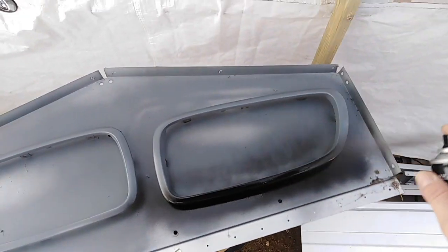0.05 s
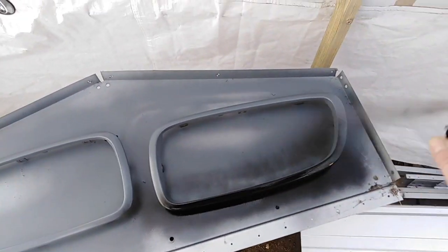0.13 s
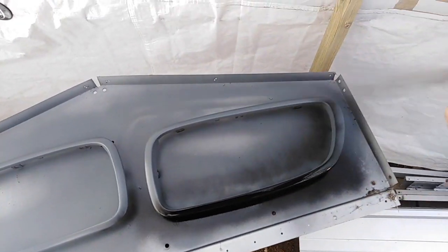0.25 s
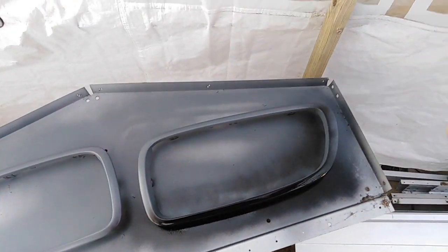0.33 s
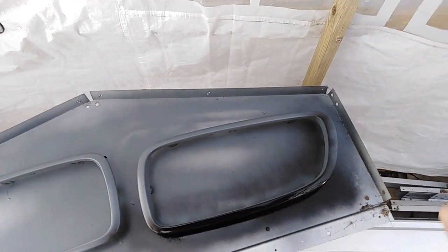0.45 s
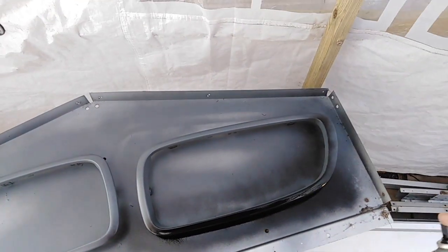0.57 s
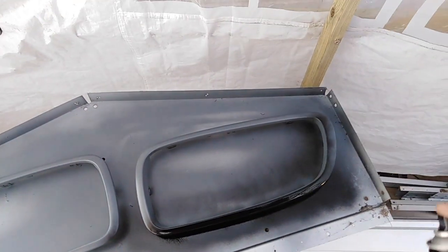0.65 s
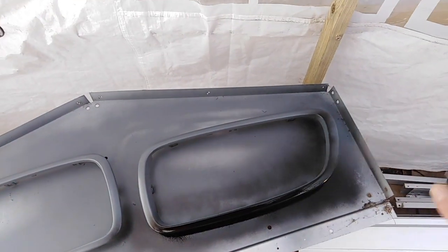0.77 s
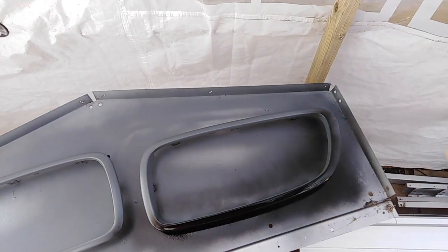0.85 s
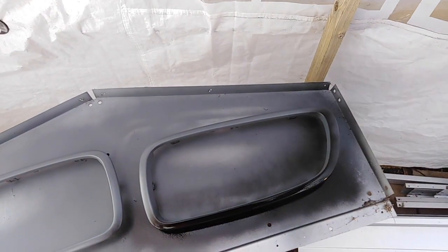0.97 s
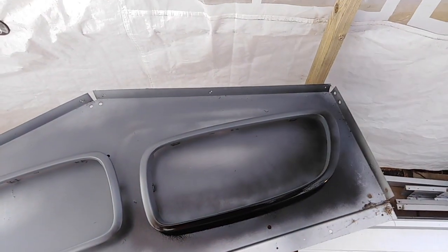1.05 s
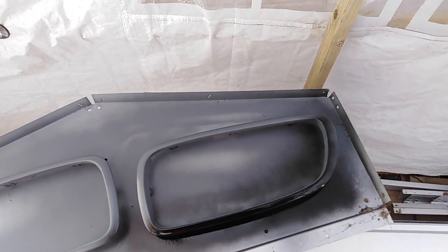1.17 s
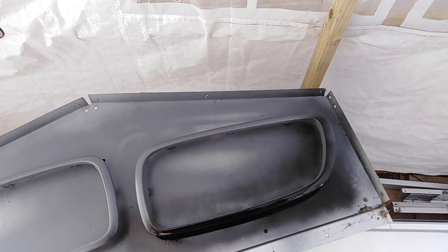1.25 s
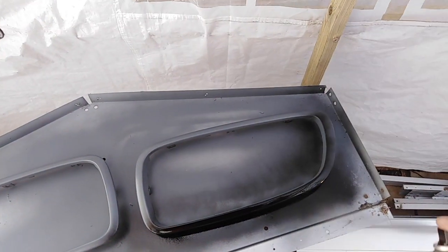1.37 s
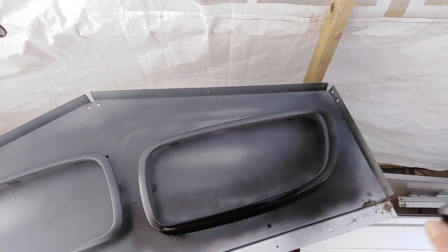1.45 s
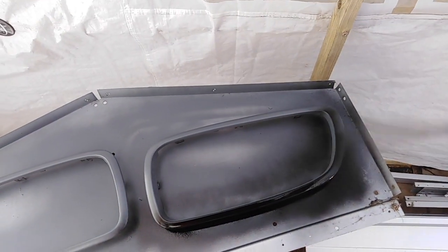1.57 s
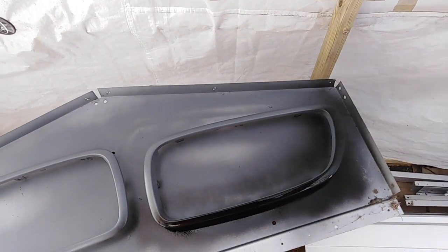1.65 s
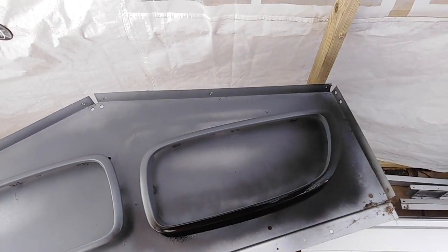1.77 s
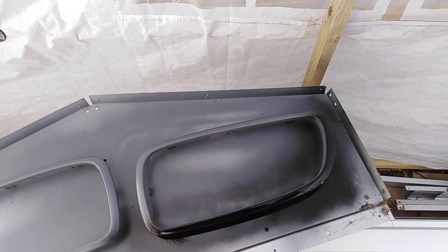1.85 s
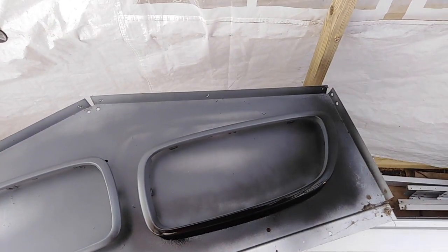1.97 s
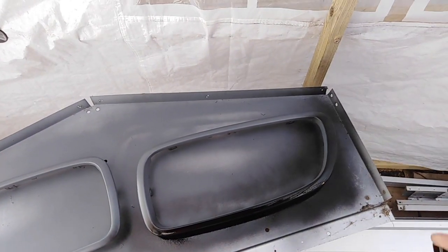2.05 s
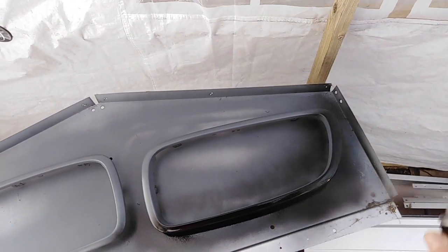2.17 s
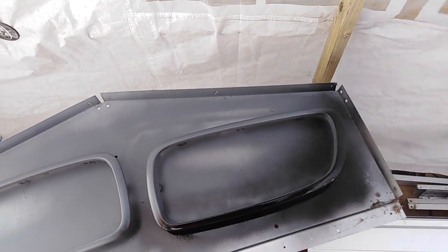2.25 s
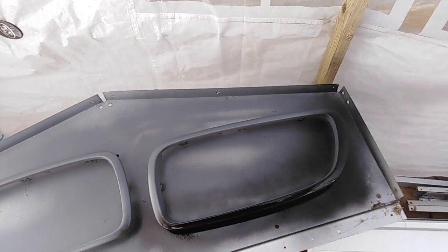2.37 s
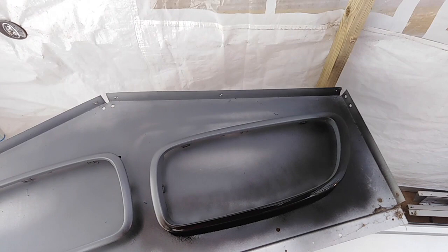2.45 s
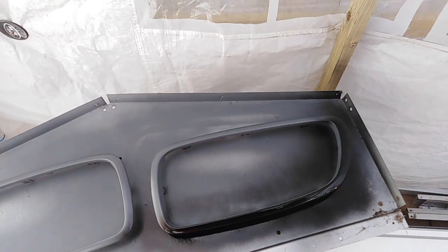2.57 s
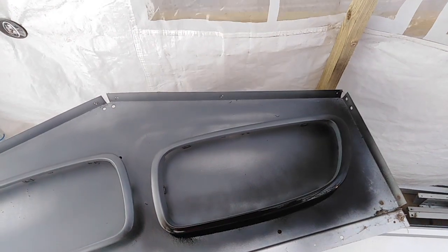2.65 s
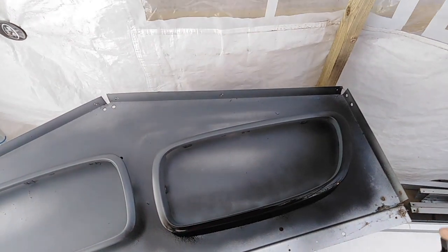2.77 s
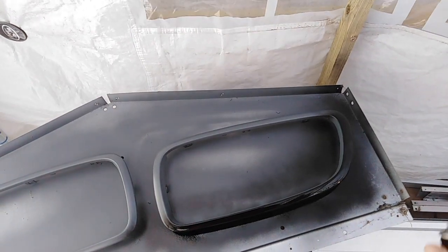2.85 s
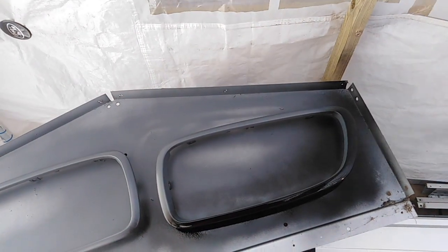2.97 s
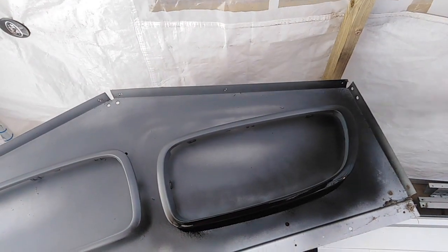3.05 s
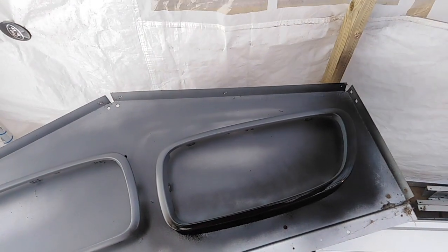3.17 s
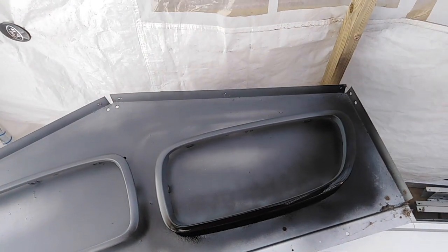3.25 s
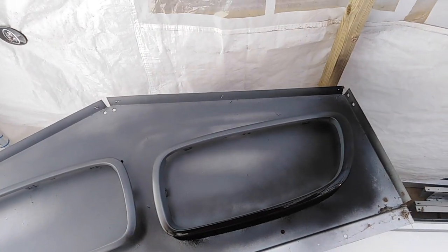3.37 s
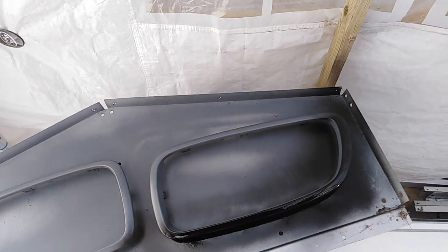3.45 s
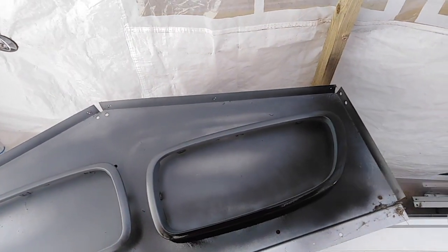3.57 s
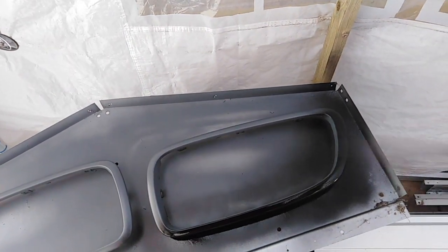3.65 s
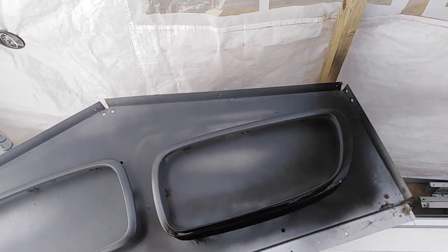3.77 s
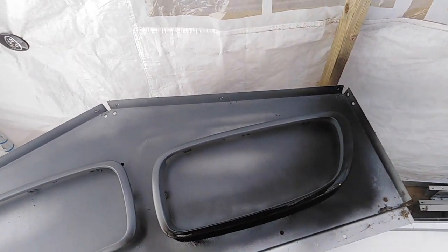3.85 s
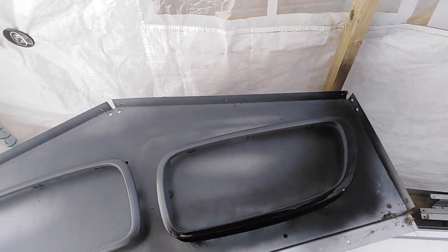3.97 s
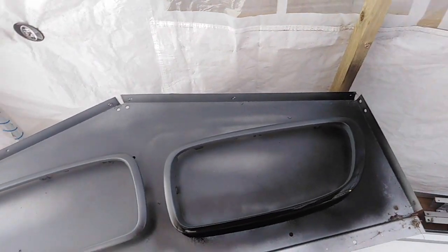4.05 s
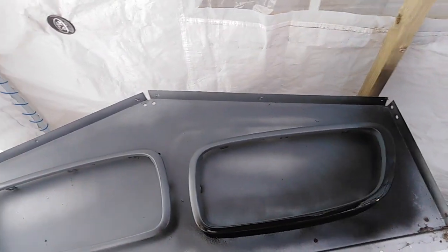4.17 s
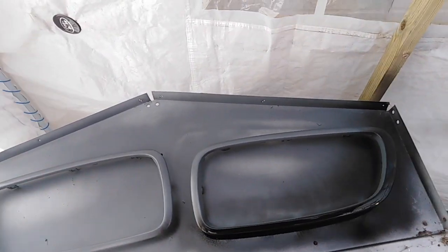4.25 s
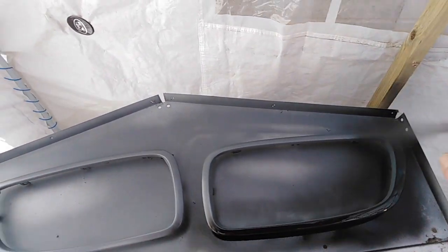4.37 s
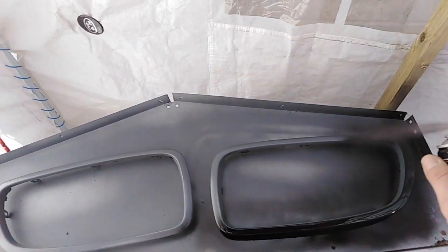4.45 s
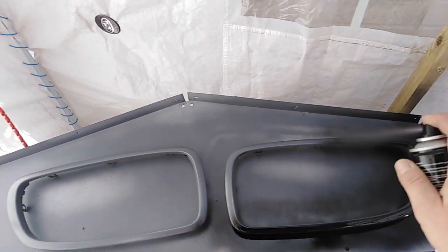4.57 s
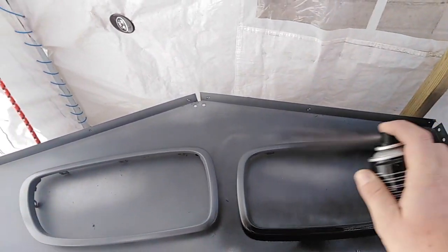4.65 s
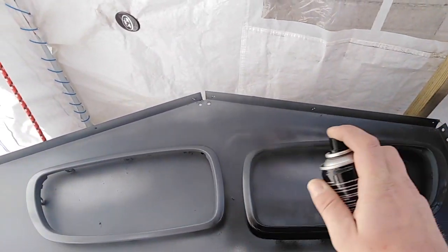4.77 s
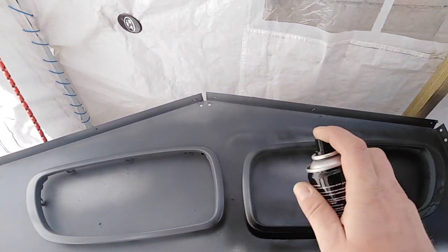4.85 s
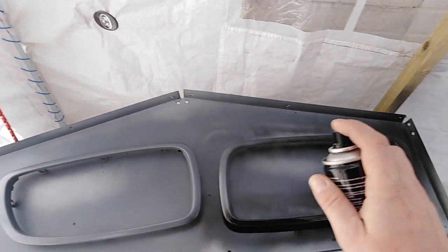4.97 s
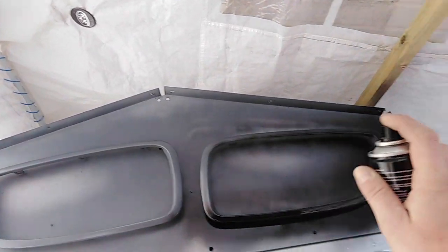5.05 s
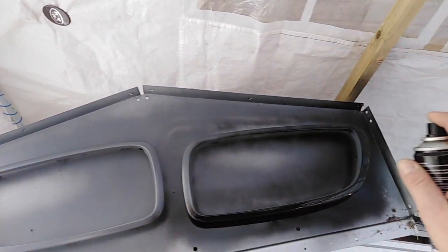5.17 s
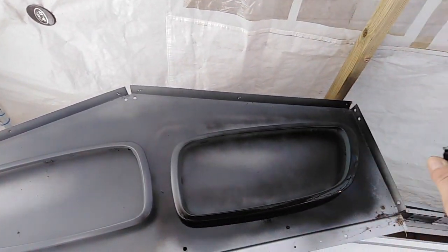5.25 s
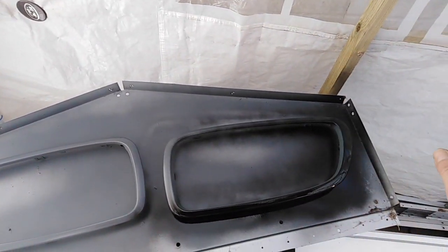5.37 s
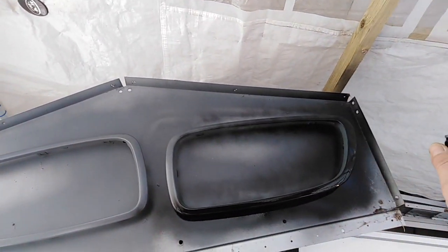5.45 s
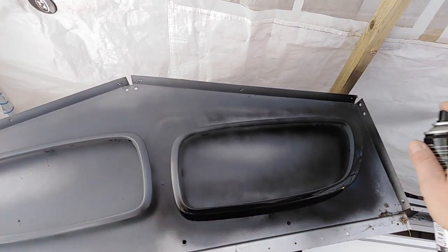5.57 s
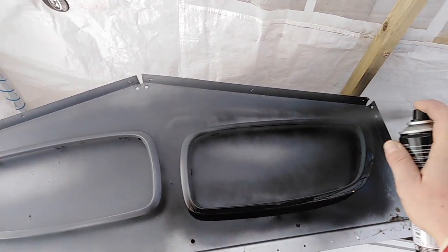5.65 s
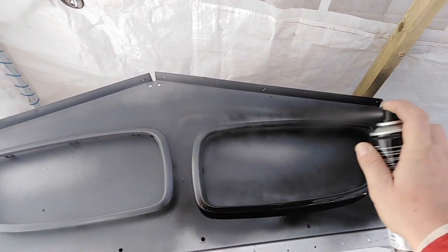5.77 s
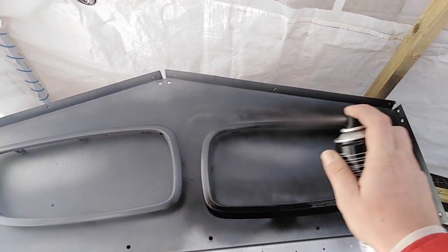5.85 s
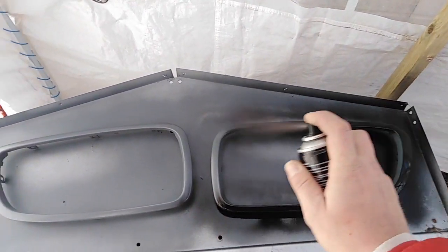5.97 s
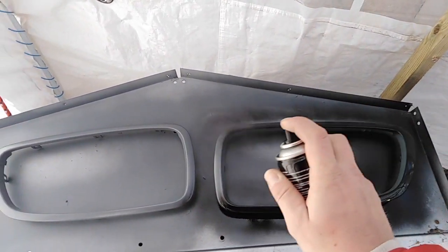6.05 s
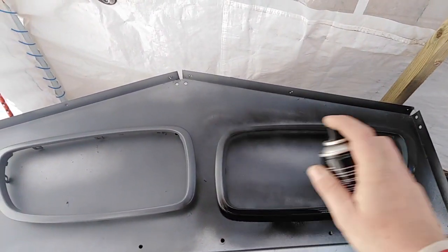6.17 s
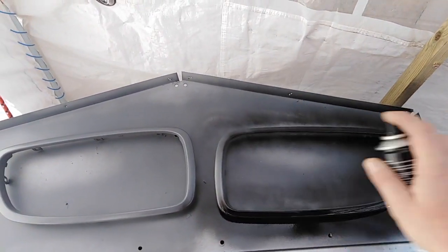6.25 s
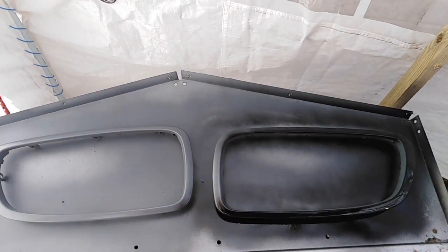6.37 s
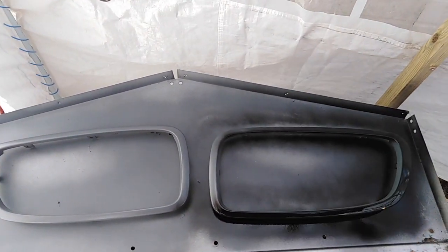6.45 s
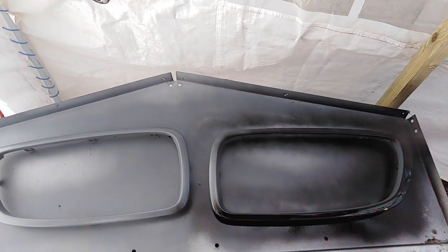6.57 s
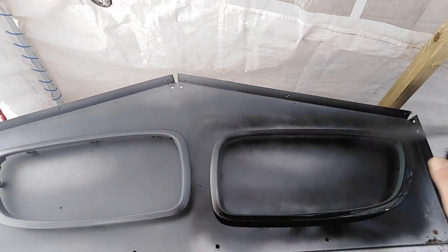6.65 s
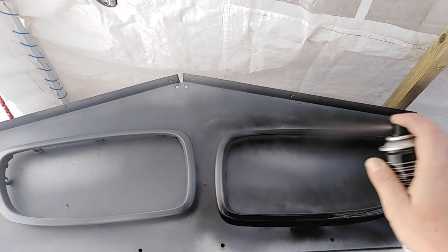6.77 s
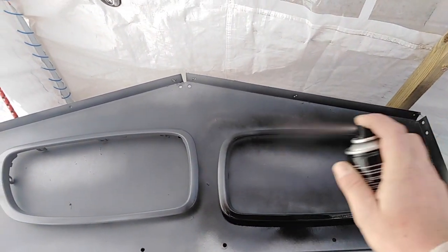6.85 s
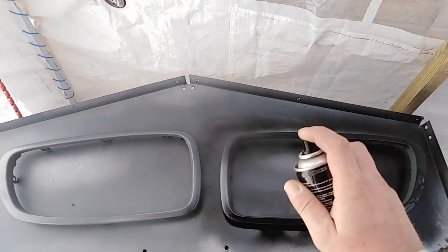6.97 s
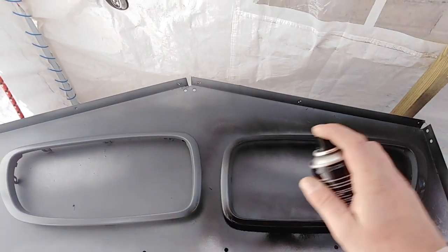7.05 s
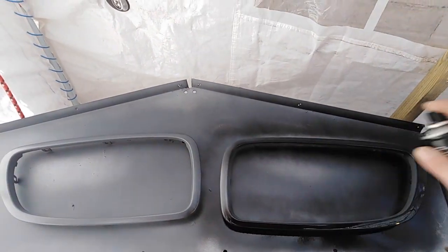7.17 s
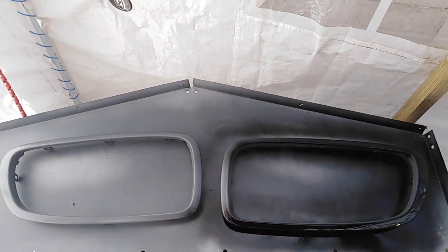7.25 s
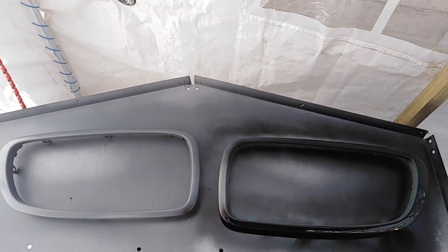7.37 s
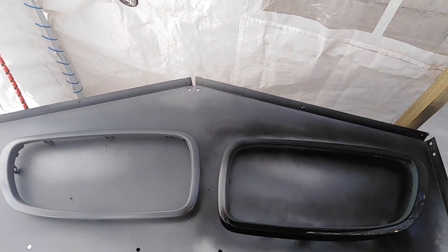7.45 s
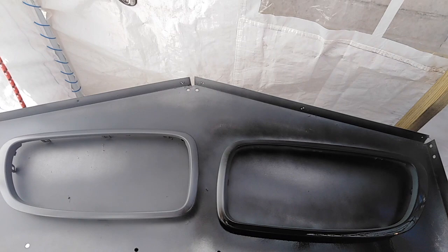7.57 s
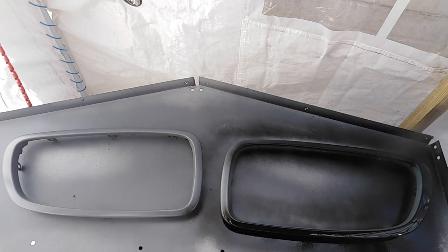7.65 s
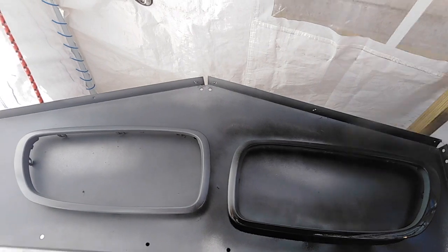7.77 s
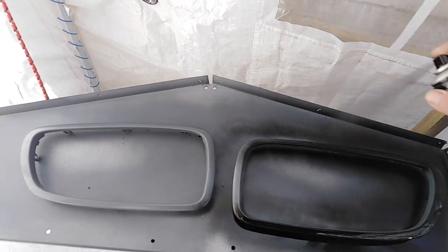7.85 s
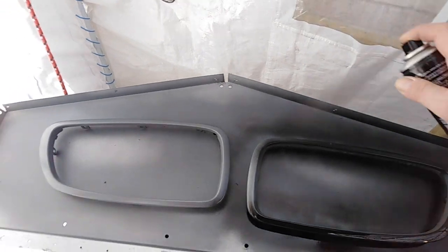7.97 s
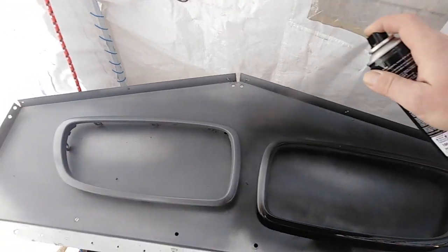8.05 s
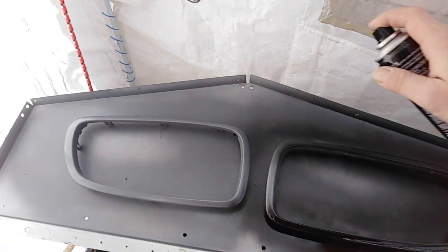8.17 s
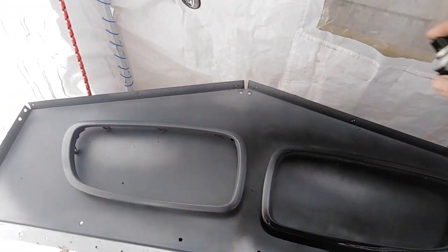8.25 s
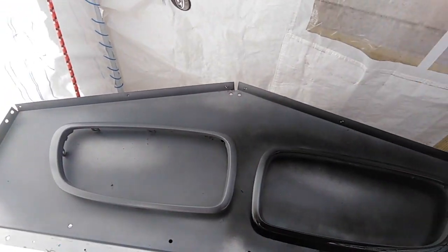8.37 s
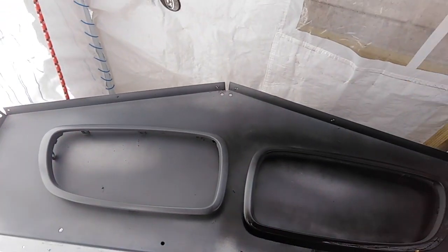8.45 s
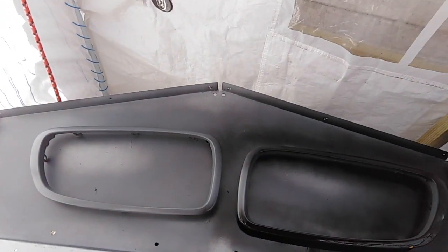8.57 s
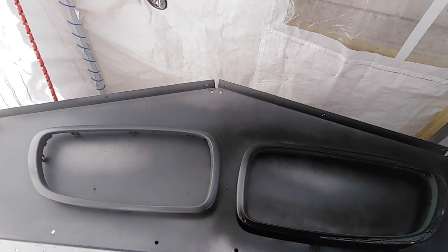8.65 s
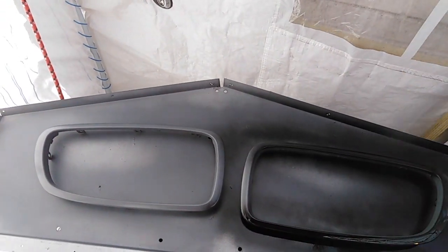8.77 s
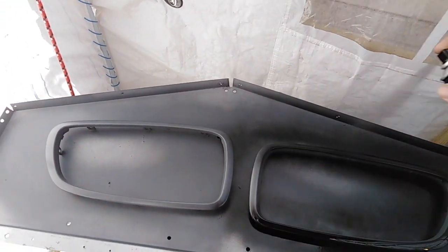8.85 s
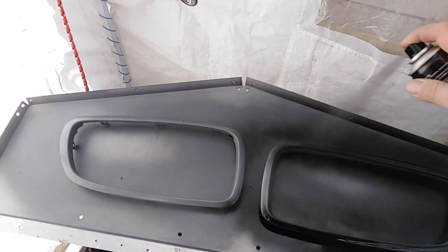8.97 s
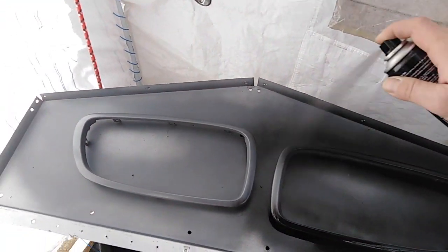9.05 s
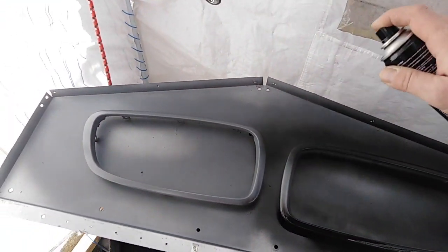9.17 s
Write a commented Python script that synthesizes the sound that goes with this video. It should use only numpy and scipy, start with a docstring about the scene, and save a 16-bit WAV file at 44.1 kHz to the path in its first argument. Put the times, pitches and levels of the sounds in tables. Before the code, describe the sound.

A nearby spray paint can works outdoors, a little right of a stereo microphone. A bright, sharp hiss is already sounding at 0 s and stops by 0.3; a dense burst of hard steel ball clacks and grainy paint slosh follows at 0.45-0.63. Short sprays then come at about 0.6, 1.3, 2.1, 2.8 and 3.5 s, with quick rattles between them. From 4.2 s the hisses lengthen to about half a second: 4.2, 5.5, 6.5, 7.4 and 8.6, the 7.4 one longest. Rattles are softer near 4.8 and nearly absent around 5.2, return at 6.1-6.4 and 7.1-7.4, and hit loudest at 8.5. Low lumpy rumble and rustle lie beneath, with dull brushing near 2.4-2.7 s and fluttering low wind puffs on the left at 7.2 and 9 s, quieter whenever the spraying pauses.

```python
"""Spray painting with a rattling can

A paint can is swept to and fro outdoors, right of a two-port camera microphone.
Each press of the valve lets out a bright hiss: noise shaped as a jet over a duller body.
At each turn the mixing ball strikes damped steel modes and the paint sloshes as grainy noise.
Low noise makes the rumble, rustle and brushing; wobbling tones make puffs of wind on the ports."""
import sys
import numpy as np
from scipy import signal
from scipy.fft import rfft, irfft, next_fast_len
from scipy.io import wavfile
from scipy.ndimage import uniform_filter1d

SR = 44100
rng = np.random.default_rng(int(sys.argv[2]) if len(sys.argv) > 2 else 0)


def store_wav(level_fs):
    """Save 16-bit WAV to argv[1]."""
    pcm = np.round(np.clip(np.atleast_2d(level_fs), -1, 1) * 32767)
    wavfile.write(sys.argv[1], SR, pcm.T.astype(np.int16))


N = 406602


def from_db(db):
    """Decibels to gain."""
    return 10 ** (np.asarray(db) / 20)


def rms_one(x):
    """Scale to unit rms."""
    return x / np.sqrt(np.mean(x ** 2) + 1e-20)


def in_time(rows):
    """Columns of a table, joined by straight lines, at every sample."""
    s, *columns = np.transpose(rows)
    return [np.interp(np.arange(N) / SR, s, column) for column in columns]


def at_hz(points, hz):
    """A spectrum table read on a log-frequency axis."""
    point_hz, value = np.array(points).T
    return np.interp(np.log(hz), np.log(point_hz), value)


def drift(rate_hz):
    """Slow chance: noise at every 20th sample through a double one-pole low-pass; spread 1."""
    r = np.exp(-40 * np.pi * rate_hz / SR)
    noise = rng.standard_normal(N // 20 + 2002)
    slow = signal.lfilter([1], [1, -2 * r, r * r], noise)[2000:]   # drop the filter's start
    return np.interp(np.arange(N) / 20, np.arange(len(slow)), rms_one(slow))


def resonance(x, hz, width_hz):
    """Two-pole peak of gain 1."""
    r = np.exp(-np.pi * width_hz / SR)
    poles = [1, -2 * r * np.cos(2 * np.pi * hz / SR), r * r]
    return signal.lfilter([(1 - r * r) / 2, 0, (r * r - 1) / 2], poles, x)


def coloured(spectrum, flicker_db, rate_hz):
    """Three unrelated noises with one spectrum and one shared flicker; rms 1."""
    size = next_fast_len(N)
    hz = np.maximum(np.arange(size // 2 + 1) * SR / size, 1)
    white = rfft(rng.standard_normal((3, size)))
    noise = irfft(white * from_db(at_hz(spectrum, hz)), size)[:, :N]
    return rms_one(noise * from_db(flicker_db * drift(rate_hz)))


def swells(rows):
    """Bell-shaped rises and falls of gain."""
    t = np.arange(N) / SR
    return sum(from_db(db) * np.exp(-.5 * ((t - s) / half_s) ** 2) for s, half_s, db in rows)


def shape_db(start_s, rise_s, length_s, power, fade_db_per_s, end_db_per_s):
    """Rise as a power of time, a steady fade, then an added fall from the end; dB re the top."""
    t = np.arange(N) / SR - start_s
    rise_db = 20 * power * np.log10(np.clip(t / rise_s, 1e-6, 1))
    fade_db = fade_db_per_s * np.clip(t - rise_s, 0, max(length_s - rise_s, 0))
    end_db = end_db_per_s * np.maximum(t - length_s, 0)
    return rise_db - fade_db - end_db


def two_ports(common, left, right, lag_s, solid=0):
    """Per frequency, a share reaches both ports, offset in time on the left; the rest is each port's own.

    All of it is shaded between the ports; solid reaches both whole."""
    # share common to both ports: hz, share (0 to 1)
    likeness = [(60, 0.91), (130, 0.83), (290, 0.94), (640, 0.63), (2400, 0.37), (4500, 0.16), (8000, 0.15),
                (14000, 0.022)]
    # left port against right: hz, level_db
    shadow = [(60, 0), (600, -1), (2000, -3.5), (4300, -3), (8000, -8.5), (14000, -6)]
    size = next_fast_len(N + 64)
    hz = np.maximum(np.arange(size // 2 + 1) * SR / size, 1)
    alike = np.clip(at_hz(likeness, hz), 0, 1)
    shade = from_db(at_hz(shadow, hz) / 2)   # half the difference at each port
    c, l, r, whole = rfft([common, left, right, solid + 0 * common], size)
    both = np.sqrt(alike) * c + whole
    late = np.exp(-2j * np.pi * hz * lag_s)
    at_left = shade * (both * late + np.sqrt(1 - alike) * l)
    at_right = (both + np.sqrt(1 - alike) * r) / shade
    return irfft([at_left, at_right], size)[:, :N]


def valve():
    """Gains of the jet and of its body: each press opens as a power of time, sags, then closes."""
    # presses: start_s, rise_s, held_s (from the start), closing_db_per_s, jet_db, sag_db_per_s,
    # body_db (re the jet)
    presses = [(-.1, 0.076, 0.34, 312, -18.5, 14.5, -11), (0.626, 0.047, 0.31, 400, -23.5, -0.5, -8),
               (1.295, 0.04, 0.37, 279, -19, 12, -13), (2.06, 0.058, 0.3, 299, -21, -2.5, -12),
               (2.797, 0.12, 0.29, 289, -21.5, 13, -11), (3.451, 0.056, 0.34, 250, -17, 12.5, -13),
               (4.191, 0.054, 0.53, 330, -22, -3, -12.5), (5.472, 0.095, .51, 252, -21, -0.5, -12),
               (6.498, 0.077, 0.45, 324, -20.5, 0.5, -12), (7.422, 0.15, 0.67, 409, -20.5, 2.5, -13),
               (8.582, 0.0028, 0.52, 314, -19.5, 5.5, -15.5)]
    opening_power = 1.39
    seals_below_db, seal_steeper = -56.5, 1.1   # extra dB per dB below this level
    jet, body = 0, 0
    for s, rise_s, held_s, closing, jet_db, sag, body_db in presses:
        db = jet_db + shape_db(s, rise_s, held_s, opening_power, sag, closing)
        gain = from_db(db + seal_steeper * np.minimum(db - seals_below_db, 0))
        jet = jet + gain
        body = body + gain * from_db(body_db)
    return jet, body


def patchy(x, patch_db, rate_hz):
    """Bands half an octave apart swell separately as the moving hand changes the echoes off the panel."""
    size = next_fast_len(N)
    spectrum, hz = rfft(x, size), np.arange(size // 2 + 1) * SR / size
    place = np.clip(2 * np.log2(np.maximum(hz, 1) / 2500), 0, 5)   # half octaves above 2500 Hz
    out = 0
    for centre in range(6):
        share = np.clip(1 - abs(place - centre), 0, 1)   # overlapping triangles
        band = irfft(spectrum * share, size)[:, :N]
        out = out + from_db(patch_db * drift(rate_hz)) * band
    return out


def spray():
    """Turbulent jet noise that sputters with the droplets; below it a duller body."""
    # bright jet, relative spectrum: hz, level_db (per Hz)
    jet_spectrum = [(1900, -37.5), (3200, -4), (4480, -2), (5800, 0.5), (8000, 0.5), (10600, 6),
                    (13000, 4.5), (14250, 4.5), (14450, -61)]
    # lower part of the hiss, with a broad nozzle resonance: hz, level_db (per Hz, relative)
    body_spectrum = [(300, -12), (600, -13.5), (1100, -11), (2000, -5.5), (2450, 1), (2870, 3), (3150, -9),
                     (3500, -21), (4500, -28.5)]
    jet_gain, body_gain = valve()
    body = coloured(body_spectrum, flicker_db=2.0, rate_hz=15)
    jet = patchy(coloured(jet_spectrum, flicker_db=.9, rate_hz=150), patch_db=1.6, rate_hz=20)
    sputter = from_db(0.36 * drift(26))
    return sputter * (jet_gain * jet + body_gain * body)


def bed():
    """Lumpy rumble and rustle, nearby brushing, a faint tone, and puffs that set the left port wobbling."""
    # low bed over time: time_s, rumble_db, rustle_db
    bed_levels = [(0.0, -51.5, -53.5), (.8, -47.5, -53), (1.6, -53, -50), (2.4, -46, -47), (3.3, -48, -46),
                  (4.0, -50.5, -48.5), (4.7, -49.5, -58.5), (5.1, -50, -59.5), (5.6, -52.5, -49.5),
                  (7.0, -49, -48.5), (8.04, -53, -48), (8.27, -54.5, -48.5), (9.22, -45, -44.5)]
    # relative spectra: hz, level_db (per Hz)
    rumble_spectrum = [(25, -29), (45, -36), (70, 10.5), (100, 1.5), (150, 3.5), (230, -47.5)]
    rustle_spectrum = [(120, -10.5), (200, 4), (350, 1.5), (500, -2), (650, -15.5), (1000, -44.5)]
    scuff_spectrum = [(120, -29), (220, -8), (350, -0.5), (480, -11), (650, -12.5), (2000, -7.5),
                      (3500, -26)]
    # dull broad brushing: middle_s, half_length_s (standard deviation), level_db
    scuff_swells = [(2.12, 0.018, -36.5), (2.35, 0.025, -29.5), (2.686, 0.27, -38.5), (0.74, 0.14, -40.5),
                    (6.56, 0.0065, -36), (7.28, 0.036, -47.5), (9.06, 0.11, -40.5)]
    # wind: middle_s, half_length_s (standard deviation), level_db (before each port's gain below)
    puff_swells = [(5.352, 0.0099, -43), (7.163, 0.012, -29), (7.193, 0.015, -27.5), (7.245, 0.023, -39),
                   (7.31, 0.017, -42), (8.945, 0.014, -23), (9.0, 0.012, -31.5), (9.105, .01, -32),
                   (9.14, .008, -38.5), (9.2, 0.025, -42)]
    hum_middle_s, hum_half_s, hum_db = 6.7, 0.91, -56.5
    hum_hz, hum_width_hz = 200.5, 5.4

    rumble_db, rustle_db = in_time(bed_levels)
    rumble = from_db(rumble_db) * coloured(rumble_spectrum, flicker_db=4.0, rate_hz=27)
    rustle = from_db(rustle_db) * coloured(rustle_spectrum, flicker_db=4.5, rate_hz=9.6)
    scuff = swells(scuff_swells) * coloured(scuff_spectrum, flicker_db=2.0, rate_hz=86)

    tone = rms_one(resonance(rng.standard_normal(N), hum_hz, hum_width_hz))
    hum = swells([(hum_middle_s, hum_half_s, hum_db)]) * tone

    wobble_hz = 104 * from_db(2.2 * drift(50))   # pitch wanders around 104 Hz
    turn = 2 * np.pi * np.cumsum(wobble_hz) / SR
    wobble = np.sin(turn) + 0.18 * np.cos(2 * turn)
    puff = swells(puff_swells) * from_db(1.0 * drift(37)) * wobble
    port_gain = from_db([[8], [-10]])   # left, right
    return two_ports(*(rumble + rustle + scuff + hum), 0) + puff * port_gain


def slosh():
    """Wet grainy wash, with dense small ticks of the rolling ball; fingers tap the shell now and then."""
    # paint surging as the arm slows and swings back:
    # start_s, rise_s, lasts_s (from the start), peak_db, fading_db_per_s
    surges = [(0.247, .03, 0.22, -53, 37), (0.465, 0.0073, 0.36, -33, 8), (0.973, .03, 0.26, -59.5, 28),
              (1.118, 0.011, 0.3, -35, 34), (1.708, 0.03, 0.13, -48, 248), (1.803, 0.067, 0.37, -38, -19),
              (2.384, 0.0091, 0.13, -37, 83), (2.483, 0.053, 0.17, -39, 20), (2.608, 0.0083, 0.4, -35, -1),
              (3.089, 0.15, 0.21, -39, 260), (3.313, 0.0086, 0.41, -31.5, 51),
              (3.851, 0.039, 0.15, -41, 209), (4.023, 0.009, 0.13, -55, 109), (4.103, 0.16, 0.19, -29.5, 6),
              (4.728, 0.033, 0.16, -46.5, -3), (5.986, 0.16, 0.19, -30.5, 246.5),
              (6.18, 0.02, 0.085, -52, 5), (6.276, 0.023, 0.43, -34, 38), (6.973, 0.019, 0.18, -47, 31),
              (7.127, 0.14, 0.38, -36.5, 54), (8.11, 0.027, 0.27, -46, 82), (8.416, .005, 0.022, -66, 100),
              (8.476, 0.0027, 0.028, -31.5, 255), (8.518, 0.0055, 0.24, -31.5, -1),
              (9.133, 0.029, 0.12, -42, 5)]
    # relative spectrum of the wash: hz, level_db (per Hz)
    wash_spectrum = [(500, -27), (900, -9), (2300, -9), (3200, 2), (6000, -5), (10700, -10), (14200, -18),
                     (14450, -74)]
    # fingers shifting on the can: middle_s, half_length_s (standard deviation), level_db
    tap_swells = [(.424, 0.0016, -33.5), (3.23, 0.037, -42), (8.27, 0.018, -46.5), (8.33, 0.013, -52.5),
                  (8.42, 0.019, -59)]
    surge_power, settle_db_per_s = 2.28, 697.5   # gain grows as time to a power; then the paint settles
    rest_db = -94   # faint wash while the arm rests

    level = 0
    for s, rise_s, lasts_s, db, fading in surges:
        level = level + from_db(db + shape_db(s, rise_s, lasts_s, surge_power, fading, settle_db_per_s))

    # about 300 ticks a second, each dying away in 0.7 ms
    ticks = (rng.random(N) < 300 / SR) * np.minimum(rng.exponential(0.6, N), 2.5)
    grain = 1 + signal.lfilter([1], [1, -np.exp(-1 / (0.0007 * SR))], ticks)
    moving = level * grain * from_db(1.5 * drift(60))
    wash = (from_db(rest_db) + moving) * coloured(wash_spectrum, flicker_db=1.2, rate_hz=12)

    shell = resonance(rng.standard_normal((3, N)), 1100, 600)
    shell = rms_one(resonance(shell, 1100, 600))
    taps = swells(tap_swells) * from_db(4 * drift(70)) * shell
    return wash + taps


def knocks():
    """A sharp contact, a noisy skid and a faint ringing-on drive the damped wall modes.

    Each spot struck weighs the modes anew."""
    # mixing ball on the wall: time_s, peak_db (before wall_db), brightness_db (per octave over
    # 3800 Hz, before even_bright_db is taken off), skid_db (re the contact)
    ball_hits = [(0.3504, -38, -11.0, -1), (0.4213, -34, -4, -3), (0.4687, -16, -2, -9.0),
                 (0.4795, -10, -2.5, -3.0), (0.5045, -8.5, -7, -17), (0.5176, -13, -4, -6),
                 (0.5356, -13.0, -6, -4.0), (0.541, -13, -6.0, -4.0), (0.546, -14.5, 1, 0),
                 (0.5703, -16, -2, -26), (0.5898, -18, 0, -10.0), (0.6009, -12.5, 5, -3),
                 (0.6256, -17.5, 3, -6), (1.1244, -18, 2, -6), (1.149, -12, -4, -14),
                 (1.182, -15.5, 4, -12), (1.1998, -20, 2, -13), (1.2335, -20.0, -8, 0),
                 (1.8352, -17.5, 2, 1), (1.8613, -16, 2, -4), (1.8862, -9.5, -6, -11),
                 (1.9032, -29, 5, -12), (1.9366, -7, -8, -7), (1.9482, -20, -8, -10), (1.96, -23, -17, -11),
                 (1.976, -29, -9, 6), (1.979, -15, 1, -5.0), (2.03, -17, 0.5, -12), (2.0617, -15, 0, -6.0),
                 (2.522, -18, -5, -5), (2.5534, -20, 2, -10.0), (2.5718, -21, -7.0, 0),
                 (2.5795, -8.5, -4, -10.0), (2.6217, -11.5, -9, -13), (2.6258, -23, 0, -4.0),
                 (2.652, -20, -9, -3.0), (3.1554, -22, -1, -21), (3.2354, -26, 4, 0), (3.3198, -11.5, 1, 1),
                 (3.3303, -13.5, -5, 2), (3.3442, -16, 3, 0), (3.372, -11, -5, 2), (3.3894, -18, 2, 0),
                 (3.4062, -15, 0, -5.0), (3.4384, -20.0, 5, 4), (4.1282, -23, -7.5, 2),
                 (4.153, -24.5, -3, 0), (4.8099, -20, -10, -11), (4.8766, -25.5, -9.5, -7),
                 (5.08, -58.0, -26.5, -12), (5.1345, -48.5, -31, -8), (5.159, -48, -20, -4.0),
                 (5.2368, -49.5, -20.5, -5.0), (5.3472, -46, -39, -7.0), (6.0645, -23, -12.5, -8.0),
                 (6.139, -20, -18, -5.0), (6.1578, -20, -19, -7.0), (6.269, -32.5, -8.0, 3),
                 (6.2981, -28, -10, -5.0), (6.33, -21, 2, 1), (6.362, -18.5, -5, 7), (6.4324, -18, -5, 0),
                 (6.4487, -23.0, -16, -8), (7.106, -29.0, -9, 6), (7.234, -23, 2, -2), (7.2706, -16, 4, -1),
                 (7.2986, -17.5, 1.5, 10), (7.3522, -19, -3, -3), (7.3754, -17, 0.5, -8),
                 (8.4796, -10.0, -2, -4.0), (8.5247, -2, -0.5, -9), (8.556, -11.5, 4, -2),
                 (8.5837, -10, -11, -4), (8.5861, -7, -10, 1)]
    # wall resonances: pitch_hz, width_hz (doubled in each of two passes), level_db
    wall_modes = [(2910, 740, -3), (3366, 546, 5), (4030, 930, 4), (4990, 660, 0), (5660, 310, -1),
                  (6470, 390, -2), (7700, 510, -1), (9100, 1100, -3), (11340, 400, -4), (12000, 3600, -17)]
    wall_db, even_bright_db = 2, -3.5   # gain on every peak; brightness that leaves the modes as listed
    contact_s, skid_s, ring_s = .0011, .006, .028   # decay times of the three parts of a knock
    ring_db, ring_width_hz = -17, 300
    gentle_below_db = -40   # gentler touches mostly set the sharper modes ringing
    lag_s, likeness = -0.00022, .55   # knocks wrap further round; share common to both ports

    s, peak_db, bright_db, skid_db = np.transpose(ball_hits)
    at = np.round(s * SR).astype(int)
    spot_spread_db = np.where(peak_db < gentle_below_db, 7, 3)[:, None]
    spot_db = spot_spread_db * rng.standard_normal((len(s), len(wall_modes)))
    chatter = rng.choice([-1., 1.], (3, N))

    # which knock is sounding, and for how long
    latest = np.maximum(np.searchsorted(at, np.arange(N), side="right") - 1, 0)
    since = np.arange(N) / SR - s[latest]
    begun = since >= 0
    contact = np.exp(-abs(since) / contact_s)
    skid = from_db(skid_db[latest]) * np.exp(-abs(since) / skid_s)
    force = begun * (contact + skid)
    gentle = (peak_db < gentle_below_db)[latest]
    ringing = begun * from_db(ring_db - 3 * gentle) * np.exp(-abs(since) / ring_s) + gentle * force
    force = force * from_db(-30 * gentle)

    out = 0
    for k, (hz, width_hz, level_db) in enumerate(wall_modes):
        octaves_up = np.clip(np.log2(hz / 3800), 0, 1.2)
        tilt_db = (bright_db - even_bright_db) * octaves_up
        weight = from_db(level_db + spot_db[:, k] + tilt_db)[latest]
        struck = resonance(weight * force * chatter + 1e-12, hz, 2 * width_hz)
        struck = resonance(struck, hz, 2 * width_hz)
        rung = resonance(weight * ringing * chatter + 1e-12, hz, ring_width_hz)
        rung = resonance(rung, hz, ring_width_hz)
        out = out + struck + rung

    # each knock scaled to its peak
    peak = np.maximum.reduceat(abs(out), at, axis=1).mean(axis=0)
    common, left, right = (from_db(wall_db + peak_db) / peak)[latest] * out
    own = np.sqrt(1 - likeness)
    return two_ports(0 * common, own * left, own * right, lag_s, solid=np.sqrt(likeness) * common)


def scene():
    """Can and bed at the two ports."""
    can_lag_s = -0.00014   # the sound wraps round to the left port first, though weaker there
    return two_ports(*(spray() + slosh()), can_lag_s) + knocks() + bed()


def suppressor(x):
    """The treble level, smoothed over 30 ms, turns down each listed band when under its threshold."""
    # bands turned down in quiet moments: upper_edge_hz, threshold_db, slope (dB per dB below it)
    quiet_bands = [(600, -43.5, .5), (1280, -38, 0.2), (2500, -40, 0.4)]
    high_pass = signal.butter(6, 2600, "high", fs=SR, output="sos")
    treble = signal.sosfilt(high_pass, x.mean(axis=0))
    power = uniform_filter1d(treble ** 2, size=1323, origin=400)   # window mostly in the past
    level_db = 10 * np.log10(power + 3e-9)
    out, rest = 0, x
    for edge_hz, threshold_db, slope in quiet_bands:
        band = signal.sosfiltfilt(signal.butter(4, edge_hz, fs=SR, output="sos"), rest)
        out = out + band * from_db(slope * np.minimum(level_db - threshold_db, 0))
        rest = rest - band
    return out + rest   # what lies above the last edge passes unchanged


def record(dry):
    """The bass rolled off, a noise suppressor, faint hiss, peaks stopped at full scale, the top cut."""
    low_cut_hz, top_cut_hz = 56, 15400
    self_noise_db = -82.5   # hiss of the recorder itself
    heard = signal.sosfilt(signal.butter(2, low_cut_hz, "high", fs=SR, output="sos"), dry)
    hiss = from_db(self_noise_db) * rng.standard_normal(dry.shape)
    stopped = np.clip(suppressor(heard) + hiss, -1, 1)
    return signal.sosfilt(signal.cheby2(16, 80, top_cut_hz, fs=SR, output="sos"), stopped)


dry = scene()
out = record(dry)
store_wav(out)
```